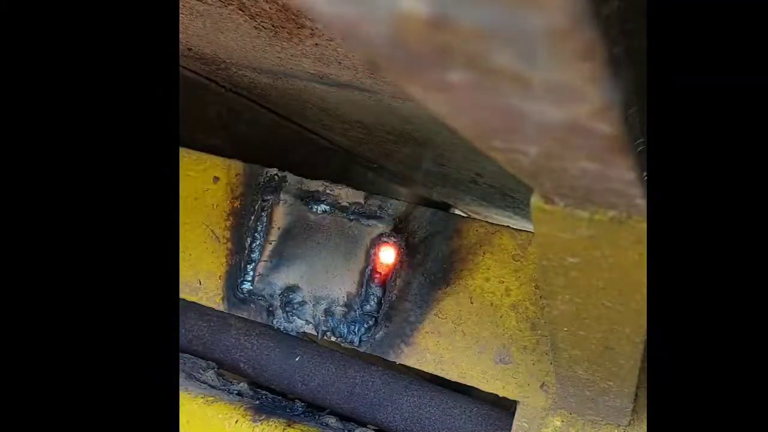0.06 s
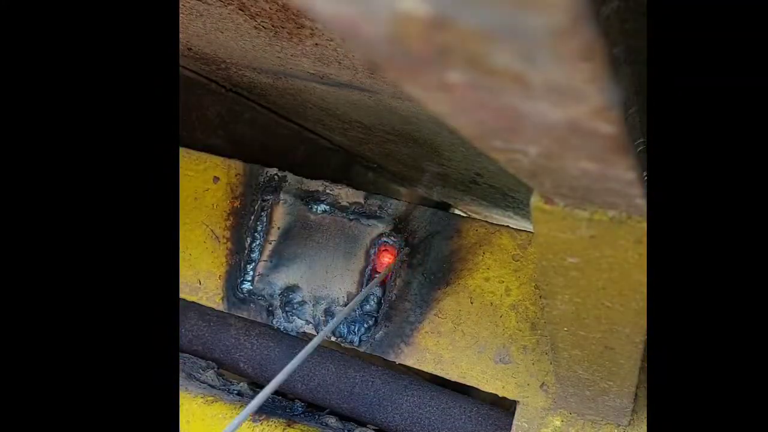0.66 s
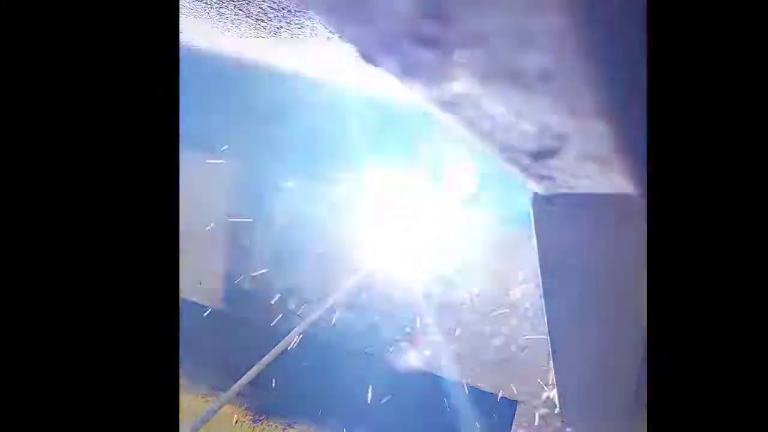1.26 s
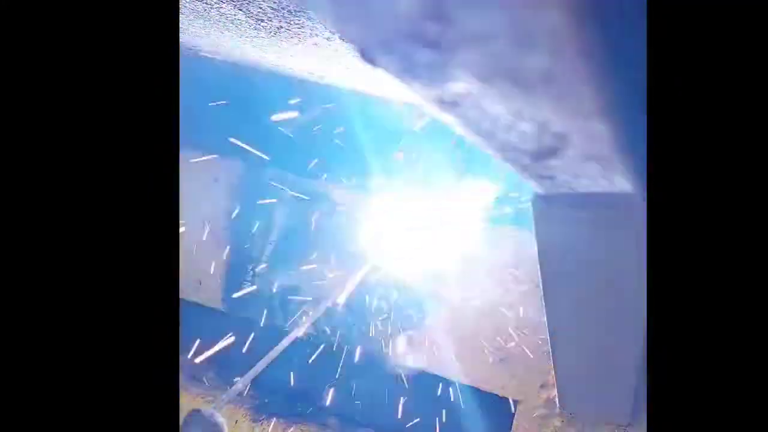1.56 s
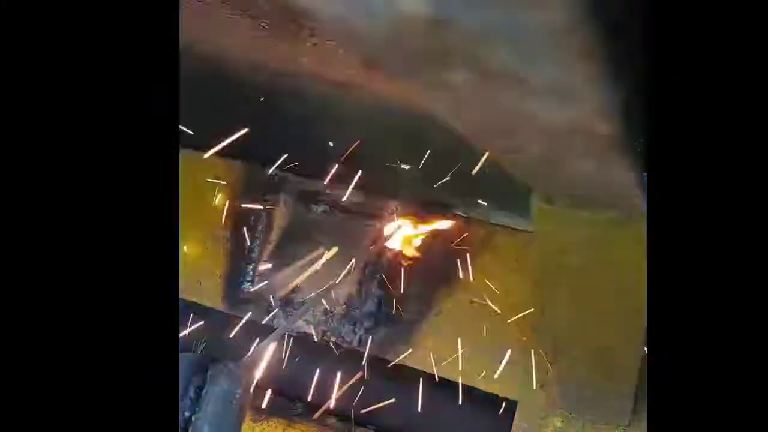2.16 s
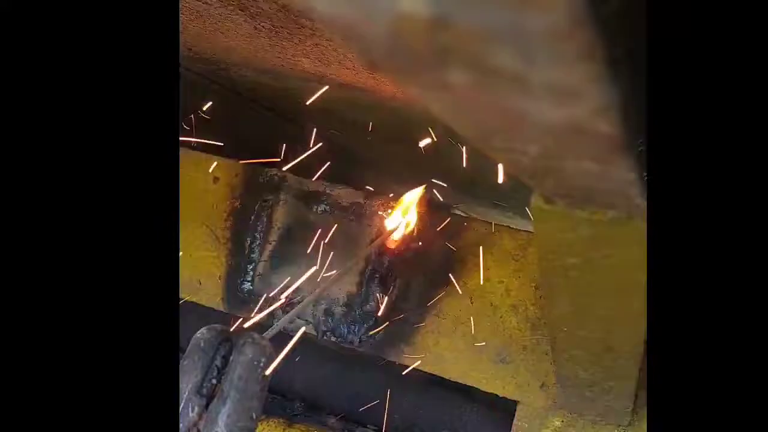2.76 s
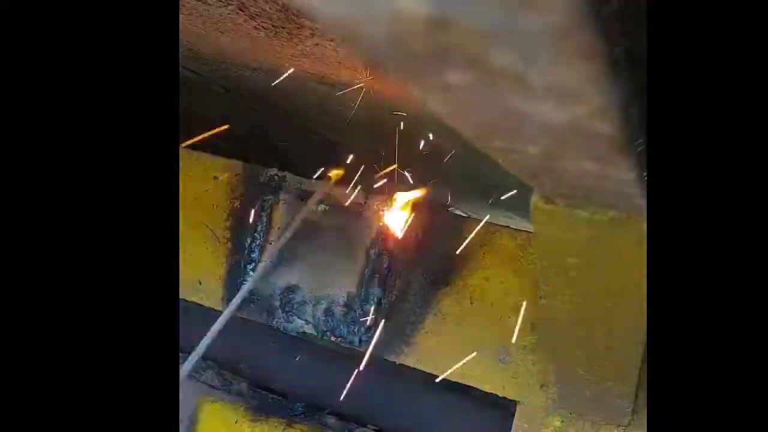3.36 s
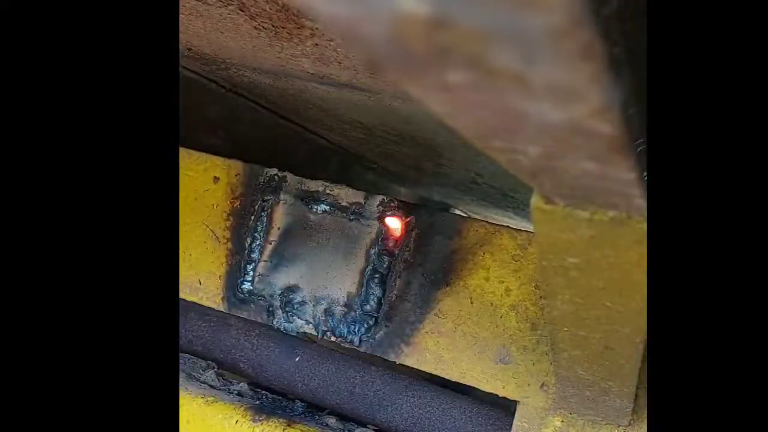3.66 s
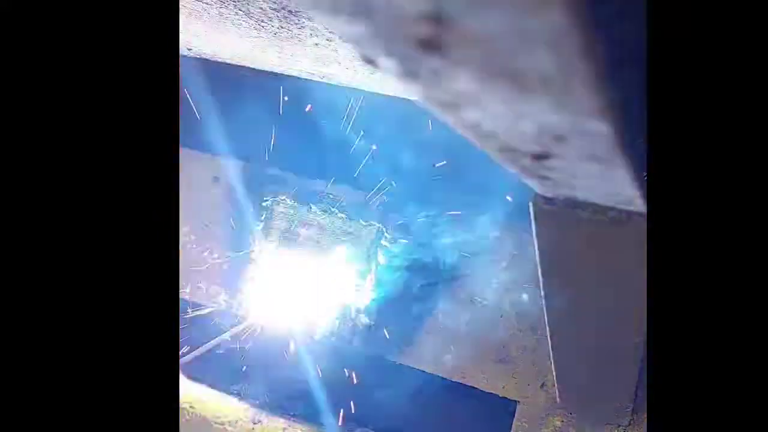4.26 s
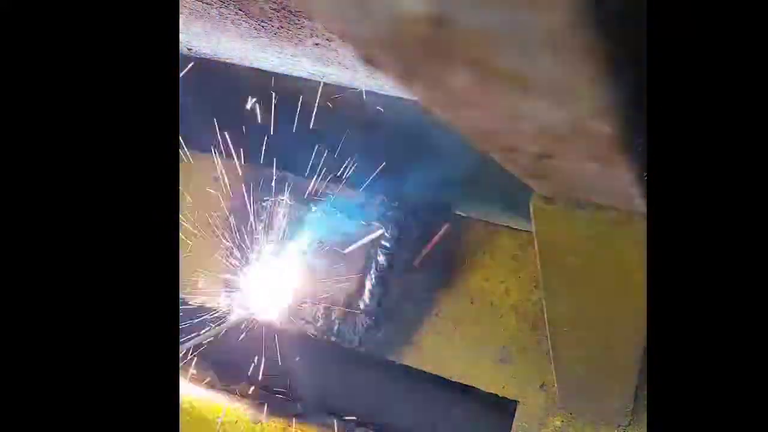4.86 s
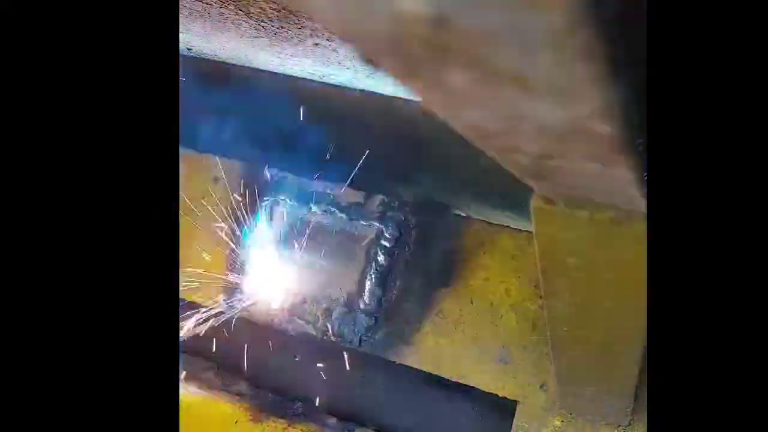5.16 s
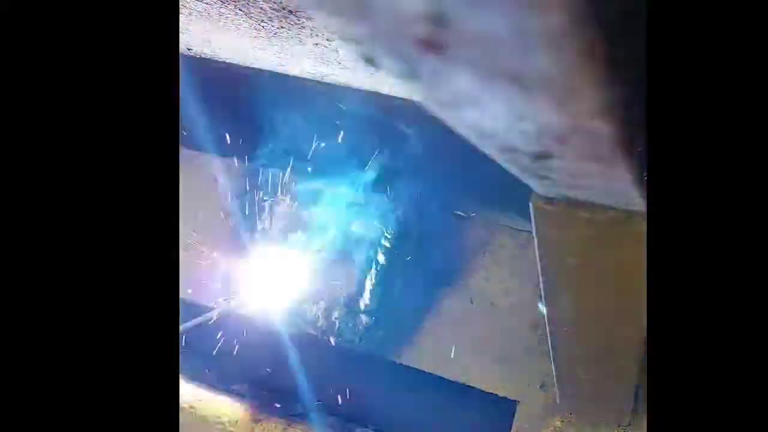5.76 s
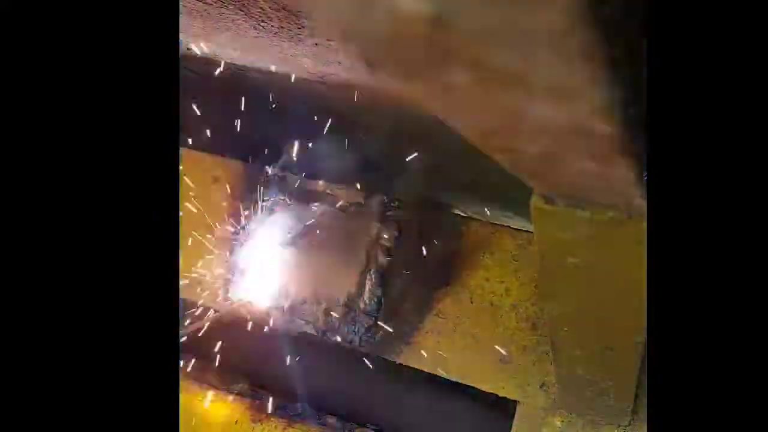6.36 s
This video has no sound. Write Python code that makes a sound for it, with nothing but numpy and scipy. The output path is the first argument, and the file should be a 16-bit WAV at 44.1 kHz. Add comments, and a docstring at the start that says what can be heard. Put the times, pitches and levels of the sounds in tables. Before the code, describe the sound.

Irregular gritty crunching and small cracks open, heard up close in a workshop with little echo. After two quick sputters of a rod on steel, a welding arc sizzles and stutters in two runs split by a short pause, the second more crackly with popping spatter. The welding machine whines faintly over its fan throughout, and a slight ringing rises and dies away at the close.

```python
"""A workshop, close to a steel frame being stick welded. The rod is tapped twice, then the arc
burns in two runs: its plasma hisses, drops of metal burst in it as snaps of spatter, and the
sound is cut whenever a drop shorts the gap. Grit crunches in irregular avalanches of grains,
with a crack when a larger piece splits. Behind it all the welder's inverter whines faintly
over its fan, and near the end a faint ringing swells and fades."""
import sys
import numpy as np
from scipy import signal
from scipy.fft import rfft, irfft
from scipy.io import wavfile
from scipy.ndimage import uniform_filter1d

SR = 44100
rng = np.random.default_rng(int(sys.argv[2]) if len(sys.argv) > 2 else 0)


def wav_out(sig):
    """Save sig, one row per channel (or a flat mono array), as 16-bit PCM at SR to the path in sys.argv[1]."""
    wavfile.write(sys.argv[1], SR, np.round(np.clip(np.atleast_2d(sig).T, -1, 1) * 32767).astype(np.int16))


N = 291060
TIME = np.arange(N) / SR
BIN_HZ = np.maximum(np.fft.rfftfreq(N, 1 / SR), 1)

# single pieces of grit splitting: t/s, relative level/dB, f/Hz, relative knock level/dB
FRACTURES = [(0.0147, -18.5, 3370, -40), (0.1046, -26, 2810, -42), (0.1154, -25.5, 3440, -31),
             (0.163, -18, 3240, -47), (0.213, -12, 3500, -41), (0.2248, -14.5, 2500, -48),
             (0.2269, -29, 2720, -54), (0.2552, -13, 4400, -52), (0.262, -18, 3060, -43),
             (0.2844, -30, 4150, -25), (0.3069, -17.5, 2400, -48), (0.313, -15.5, 4340, -51),
             (0.3216, -14, 2820, -47), (0.342, -13, 3700, -22.5), (0.4357, -28, 3560, -45),
             (0.5228, -30, 3380, -33), (0.6615, -21.5, 2460, -49), (0.6754, -22, 3280, -47),
             (0.7165, -27, 3950, -49), (1.254, -23.5, 2530, -51), (1.4195, -23.5, 3030, -56),
             (1.6032, -20, 2960, -48), (1.658, -24, 3520, -28.5), (2.111, -29, 2430, -42),
             (2.6556, -23.5, 2800, -39), (2.8667, -24, 3210, -59), (2.9219, -19.5, 3130, -35.5),
             (3.0907, -21.5, 2820, -54), (3.151, -31, 3510, -46), (3.1892, -28, 3260, -36),
             (3.23, -17.5, 2850, -44), (3.2615, -18.5, 3250, -30), (3.3393, -30, 3080, -53),
             (3.6305, -15.5, 4270, -49), (3.7479, -38, 2940, -55), (3.849, -43, 1610, -52),
             (3.8912, -48, 2950, -31), (4.0185, -28.5, 3040, -46), (4.5549, -20, 2630, -51),
             (5.336, -40, 2970, -37.5), (5.417, -39, 1627, -33.5), (5.4406, -42, 2650, -38)]
# large drops of spatter bursting: t/s, relative level/dB
LARGE_DROPS = [(0.7567, -17.5), (0.8275, -30), (0.9792, -30), (1.0685, -26.5), (1.5519, -30),
               (2.1884, -27.5), (2.2777, -43), (3.1672, -29), (4.4069, -25), (4.4468, -34), (4.555, -34),
               (4.8579, -36), (5.1108, -31), (5.3916, -40), (5.4485, -29), (5.7064, -36), (5.7229, -27),
               (5.8764, -29.5), (6.0127, -27.5), (6.094, -32), (6.2672, -26), (6.3799, -28.5),
               (6.5174, -32)]


def undb(db):
    """Amplitude ratio of a level in decibels."""
    return 10 ** (np.asarray(db) / 20)


def curves(table):
    """Linear interpolation of each column of a time table, sample by sample."""
    times, *columns = np.transpose(table)
    return [np.interp(TIME, times, column) for column in columns]


def colour(x, spectrum):
    """Filtering as a product of spectra; the rows are f/Hz, gain/dB."""
    hz, db = np.transpose(spectrum)
    return irfft(rfft(x) * undb(np.interp(np.log(BIN_HZ), np.log(hz), db)), N)


def unit(x):
    """Normalisation to rms 1."""
    return x / np.sqrt(np.mean(x ** 2))


def even(x, seconds):
    """Normalisation of a stereo texture by its running rms."""
    size = int(seconds * SR / 2)
    power = uniform_filter1d(uniform_filter1d(np.mean(x ** 2, axis=0), size), size)
    return x / np.sqrt(np.abs(power) + 1e-12)


def wander(rate):
    """Slow noise: rate random values a second, joined by lines, with a spread near 1."""
    return 1.2 * np.interp(TIME * rate, np.arange(8192), rng.standard_normal(8192))


def clicks(rate, spread_db):
    """Poisson process: rate impulses a second on average, most small and a few large."""
    occurs = rng.random(N) < rate / SR
    return occurs * undb(spread_db * np.minimum(rng.exponential(size=N), np.pi))


def add(out, start, sound):
    """Superposition of a short sound, from a start in seconds."""
    i = int(np.clip(start * SR, 0, N - 1))
    out[..., i:i + sound.shape[-1]] += sound[..., :N - i]


def echoes(x, t60, wet_db):
    """Reverberation: dense reflections decay exponentially, differently at each ear."""
    t = TIME[:SR // 2]
    tail = rng.standard_normal((2, len(t))) * undb(-60 * t / t60)
    tail /= np.sqrt(np.sum(tail ** 2, axis=1, keepdims=True))
    return x + undb(wet_db) * signal.fftconvolve(x * np.ones((2, 1)), tail, axes=1)[:, :N]


def ring():
    """Modal ringing, as of a steel part: three faint partials swell to a crest and die away."""
    # modes: f/Hz, relative level/dB
    partials = [(549, -73), (1098, -74), (1373, -65.5)]
    crest_s, crest_gain_db, rise_db_per_s, fall_db_per_s = 6.45, 11, 45, 170
    below_crest_db = np.maximum(rise_db_per_s * (crest_s - TIME), fall_db_per_s * (TIME - crest_s))
    modes = sum(undb(db) * np.sin(2 * np.pi * hz * TIME + 0.68 * wander(40)) for hz, db in partials)
    return modes * undb(crest_gain_db - below_crest_db)


def welder():
    """Random modulation roughens the inverter's tone, heard over the broadband noise of its fan."""
    # inverter tone: t/s, f/Hz, relative level/dB
    whine_track = [(0, 4830, -56.5), (.47, 4814, -56), (.62, 4772, -57), (.85, 4805, -60),
                   (1.1, 4768, -62.5), (1.42, 4820, -62.5), (3.25, 4704, -60), (3.48, 4735, -61),
                   (3.68, 4780, -57), (4.1, 4768, -60.5), (4.6, 4780, -68), (4.69, 4780, -54),
                   (4.8, 4752, -64), (6.6, 4890, -72)]
    # fan noise: f/Hz, relative spectral level/dB
    fan_spectrum = [(30, -15), (200, -24), (600, -5), (1200, -1), (2000, -20), (4300, 4), (5500, -2.5),
                    (7500, -15), (15000, -14.5)]
    hz, db = curves(whine_track)
    phase = 2 * np.pi * np.cumsum(hz + 8 * wander(70)) / SR
    roughness = [1 + .32 * wander(150) + .17 * wander(22) for _ in range(2)]
    whine = undb(db + 4.5) * np.array([ear * np.sin(phase + .5 * wander(9)) for ear in roughness])
    fan = unit(colour(rng.standard_normal((2, N)), fan_spectrum)) * undb(-61 + 0.29 * wander(17))
    return whine + fan


def crushing():
    """Incoherent powers add: crunches and trickle give the coarse level and the fine excess, in dB."""
    # light trickle of grit: t/s, coarse level/dB
    trickle = [(0, -51), (.37, -44.5), (.5, -53), (.79, -48.5), (.95, -71.5), (1.02, -51), (2.08, -52.5),
               (2.28, -57.5), (2.46, -49.5), (3.33, -47), (3.44, -57.5), (4.68, -53.5), (4.81, -68),
               (4.95, -56), (5.48, -53.5), (5.55, -61.5), (6.05, -55.5), (6.6, -53.5)]
    # fineness of the trickle: t/s, fine level above coarse/dB
    trickle_fineness = [(0, 7.5), (1, 2), (3.3, 5.5), (3.7, -3), (5.6, -24), (6.6, -5)]
    # separate crunches: start t/s, duration/s, coarse level/dB, fine level above coarse/dB
    crunches = [(.005, 0.017, -42, 3.5), (0.055, 0.023, -45, 4), (0.107, 0.072, -39, 1.5),
                (0.204, .03, -40, 10.5), (0.247, 0.1, -41.5, 8.5), (0.437, 0.031, -45.5, 3),
                (0.513, 0.0099, -39, 0), (0.638, .11, -42, 4), (0.798, 0.049, -50, 6),
                (0.886, 0.036, -50.5, 1.5), (1.044, 0.027, -50.5, 3), (1.236, 0.12, -48, 7),
                (1.467, 0.076, -46.5, 5), (1.577, 0.018, -46, 7), (1.658, 0.057, -47.5, 8),
                (1.815, 0.082, -49, 4), (2.097, 0.031, -49.5, 3), (2.337, 0.054, -45, 6),
                (2.507, .11, -47, 6), (2.69, 0.074, -45, 5), (2.833, .12, -45.5, 5), (3, 0.059, -52.5, -8),
                (3.225, 0.11, -47.5, 5.5), (3.545, 0.11, -49, 2.5), (3.745, .022, -46, 1.5),
                (3.824, 0.04, -47.5, -2.5), (3.902, 0.051, -49, 1.5), (4.029, 0.023, -48.5, 1),
                (4.123, 0.019, -50.5, -1), (4.209, 0.07, -48.5, -3.5), (4.391, 0.14, -50.5, 5),
                (4.508, .15, -48, 7.5), (5.014, 0.16, -51, -5.5), (5.267, 0.199, -46.5, -2.5),
                (6.021, 0.074, -53, -4), (6.163, 0.09, -47.5, -8), (6.397, .07, -57.5, 9)]
    attack_s, release_s = .014, .014
    jam_db, jam_s = -3, .012
    (trickle_db,), (trickle_fine_db,) = curves(trickle), curves(trickle_fineness)
    coarse, fine = undb(trickle_db) ** 2, undb(trickle_db + trickle_fine_db) ** 2
    for start, length, db, fine_db in crunches:
        rise = np.clip((TIME - start) / attack_s + .5, 0, 1)
        decay = np.exp(-np.clip((TIME - start - length) / release_s, 0, 20))
        power = (undb(db) * rise * decay) ** 2
        coarse += power
        fine += power * undb(fine_db) ** 2
    # the grit jams for a moment before a piece cracks
    breaks = np.sort([row[0] for row in FRACTURES] + [np.inf])
    to_break_s = breaks[np.searchsorted(breaks, TIME)] - TIME
    return 10 * np.log10(coarse) + jam_db * np.exp(-to_break_s / jam_s), 10 * np.log10(fine / coarse)


def grains(hz, rate):
    """Band-limited impulses: each grain lasts a few cycles, with its own size and sign at each ear."""
    hits = clicks(rate, spread_db=1) * rng.standard_normal((2, N))
    band = np.exp(-(np.log(BIN_HZ / hz) / 0.52) ** 2)
    return irfft(rfft(hits) * band, N)


def grit():
    """Granular avalanches: grit gives way as lone grains when light, as a dense crunch when heavy."""
    # timbre of the grit: f/Hz, gain/dB
    grit_spectrum = [(30, -7.5), (80, -15.5), (150, -13), (250, -12), (400, -7), (540, 0), (780, -0.5),
                     (1000, 0), (1300, 2), (1800, -3.5), (2400, 2), (3200, 2.5), (4400, -0.5), (5800, -10),
                     (8000, -19), (15000, -36)]
    coarse_db, fine_db = crushing()
    density = undb(.7 * (coarse_db + 45.5))
    avalanche = undb(2.5 * wander(70) + 2.84 * wander(240))
    out = np.zeros((2, N))
    for hz in 50 * 1.6 ** np.arange(13):
        burst = grains(hz, rate=density * 480 * (hz / 1000) ** .9 + 120) * avalanche
        # the finer the crush, the more it lifts the treble
        fine_weight = np.interp(hz, [1110, 2370, 4400, 8600], [0, 0.68, 1.44, 2.2])
        out += np.sqrt(hz / 1000) * undb(fine_weight * (fine_db - 5)) * even(burst, seconds=0.13)
    return colour(out * undb(coarse_db - 5), grit_spectrum)


def cracks():
    """Brittle fracture: a piece splits with a snap of a few cycles, a knock and a spray of fragments."""
    snap_db, spray_db = -2.5, -12
    out = np.zeros((2, N))
    t = TIME[:1024] - TIME[88]  # zero at the break
    for start, db, hz, knock_db in FRACTURES:
        snap_phase, knock_phase = 2 * np.pi * rng.random((2, 2, 1))
        snap = np.exp(-(t * hz / 1.6) ** 2) * np.sin(2 * np.pi * hz * t + snap_phase)
        knock_hz = 1020 * undb(rng.normal(0, 1))
        knock = np.exp(-(t / 0.00072) ** 2) * np.sin(2 * np.pi * knock_hz * t + knock_phase)
        noise = rng.standard_normal((2, len(t)))
        band = signal.butter(2, [hz / 3, min(hz * 1.82, SR / 3)], "band", fs=SR)
        fragments = unit(signal.lfilter(*band, noise))
        # harder breaks throw off more of the tiny, bright splinters
        splinters = undb(2.1 * db + 3) * signal.lfilter(*signal.butter(2, 11000, fs=SR), noise)
        spray = (fragments + splinters) * np.exp(-np.abs(t) / np.where(t < 0, .0007, .0024))
        crack = undb(db) * (undb(snap_db) * snap + undb(spray_db) * spray)
        add(out, start - .0005, crack + undb(knock_db + 4) * knock)
    return out


def snaps():
    """Impulsive sound: a large drop of spatter bursts with a sharp click inside a very short fizz."""
    out = np.zeros((2, N))
    t = TIME[:512] - TIME[100]  # zero at the burst
    click = t == 0
    for start, db in LARGE_DROPS:
        fizz = rng.standard_normal((2, len(t))) * np.exp(-np.abs(t) / np.where(t < 0, .0005, .0009))
        add(out, start - .001, undb(db - 2) * (click + fizz))
    return out


def burning():
    """Amplitude envelope of the arc: it flares at each strike, settles, and stops at each short."""
    # arc alight: start t/s, end t/s, relative level/dB
    burns = [(0.762, 0.773, -42.5), (0.822, .843, -47.5), (0.981, 2.187, -48), (2.234, 2.361, -49),
             (2.395, 2.63, -49), (2.646, 2.804, -47.5), (2.855, 2.984, -47.5), (3.019, 3.135, -50),
             (3.15, 3.395, -50), (3.630, 3.662, -55), (4.224, 5.811, -51), (5.841, 6.321, -52.5),
             (6.367, 6.7, -51.5)]
    strike_db, settle_s = 1, 0.3
    waver_db = .5  # the arc wavers as the gap changes
    drop_flare_db, drop_flare_s = 3, 0.011  # it runs hotter around each large drop
    envelope = np.zeros(N)
    for on, off, db in burns:
        alight = (TIME > on) & (TIME < off)
        envelope[alight] = undb(db + strike_db * np.exp(-(TIME[alight] - on) / settle_s))
    to_drop_s = np.min([np.abs(TIME - burst_s) for burst_s, _ in LARGE_DROPS], axis=0)
    heat_db = waver_db * wander(14) + drop_flare_db * np.exp(-to_drop_s / drop_flare_s)
    return uniform_filter1d(envelope, size=130) * undb(heat_db)


def arc():
    """Discharge noise: the plasma hisses and flutters while drops of metal burst in it as clicks."""
    # travel along the seam: t/s, level left minus right/dB, spatter level above hiss/dB
    travel = [(1, -3.5, -1.5), (3.4, -4, -7.5), (4.3, -2.5, -0.5), (5.2, -4, 4.5), (6.5, -2.5, -1)]
    # hiss as the steel corner shapes it: f/Hz, gain on the right seam/dB, gain on the left seam/dB
    hiss_spectra = [(150.3, -41, -34), (600, -8, -24), (1190, -3.5, -25), (2120, -18, -5), (3280, 1.5, 6),
                    (4400, -22, 2), (5754, -7, -1.5), (8940, -1.5, -3.5), (11100, 0.5, 3),
                    (11300, -3.5, -12), (12100, 4, 7.5), (14000, 1.5, -2), (14600, -4, -1),
                    (15800, -27, -7)]
    # timbre of the spatter: f/Hz, gain/dB
    spatter_spectrum = [(150, -35), (700, -33), (2000, -37), (3600, 2.5), (5000, -2), (8300, -6),
                        (10700, -2.5), (12600, 0.5), (15500, -8)]
    flurry_db, seam_change_s = 4, 4.1
    pan_db, spatter_db = curves(travel)
    spatter_share = 1 / (1 + undb(-2 * spatter_db))  # fraction of the power
    strength = burning() * undb(4)
    # drops burst in flurries, and the plasma flares around each one
    drops = clicks(rate=600, spread_db=5) * undb(flurry_db * wander(24))
    flare = uniform_filter1d(uniform_filter1d(drops, size=60), size=60)
    flutter = undb(2 * wander(35) + 0.96 * wander(400)) * (1 + 0.66 * unit(flare))
    plasma = rng.standard_normal(N) + undb(8) * rng.standard_normal((2, N))  # partly coherent ears
    hiss = even(flutter * plasma, seconds=0.047) * strength * np.sqrt(1 - spatter_share)
    sound = colour(hiss * (TIME < seam_change_s), np.array(hiss_spectra)[:, [0, 1]])
    sound += colour(hiss * (TIME >= seam_change_s), np.array(hiss_spectra)[:, [0, 2]])
    # the clicks have a straight path to the right ear while the left one is shaded
    spatter = even(drops * undb([[-5], [0]]), seconds=0.22) * strength * np.sqrt(spatter_share)
    sound += colour(spatter + snaps() * undb([[-2], [2]]), spatter_spectrum)
    sound *= undb([pan_db / 2, -pan_db / 2])
    # the steel corner sends back a few milliseconds of reflections
    return echoes(sound, t60=0.005, wet_db=-17)


def scene():
    """Direct sound dominates at close range; the workshop adds only a faint tail."""
    welding = echoes(arc(), t60=0.15, wet_db=-22)
    crunching = echoes(grit() + cracks(), t60=0.17, wet_db=-12.5)
    return welder() + ring() + crunching + welding


def record(dry):
    """Soft saturation and band limiting: the phone rounds the loudest peaks and cuts the top."""
    ceiling, cutoff_hz = .22, 15700
    lowpass = signal.ellip(8, .2, 70, cutoff_hz, fs=SR, output="sos")
    return signal.sosfilt(lowpass, ceiling * np.tanh(dry / ceiling))


dry = scene()
out = record(dry)
wav_out(out)
```